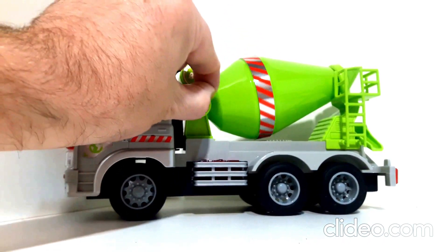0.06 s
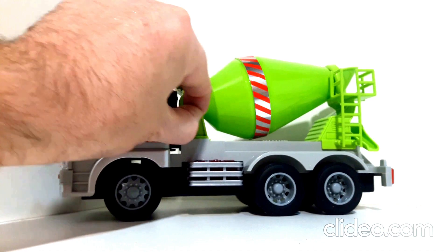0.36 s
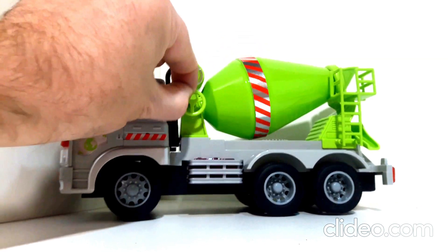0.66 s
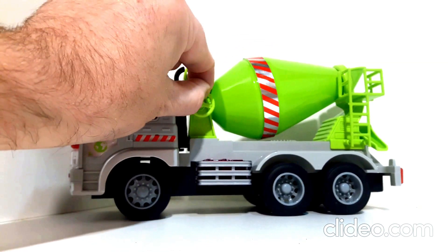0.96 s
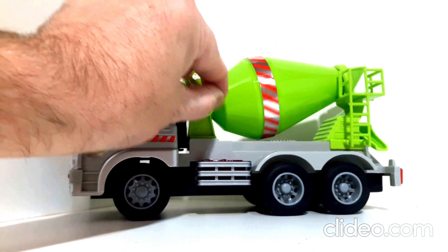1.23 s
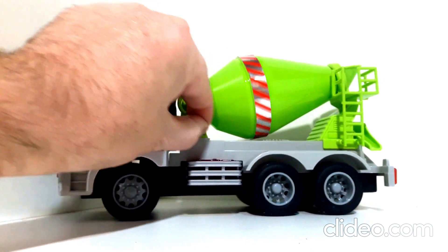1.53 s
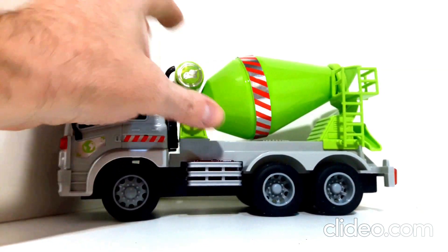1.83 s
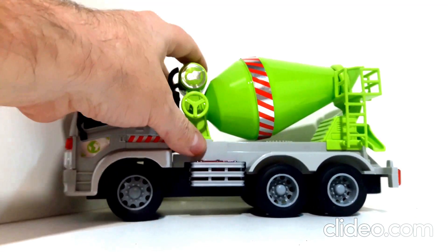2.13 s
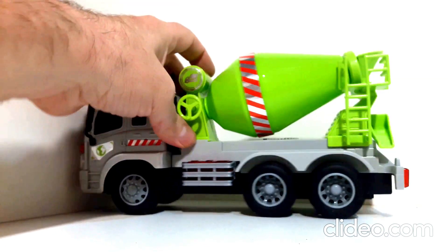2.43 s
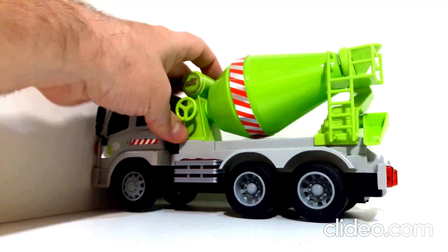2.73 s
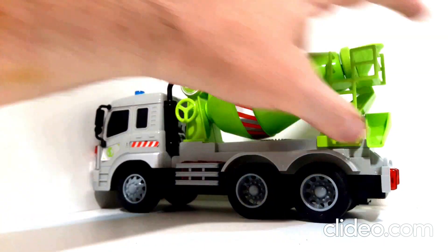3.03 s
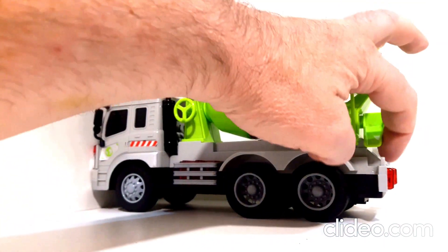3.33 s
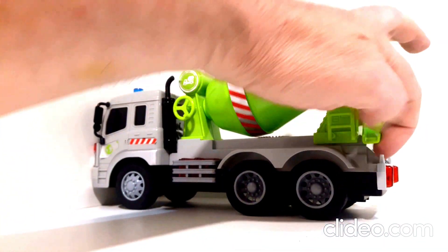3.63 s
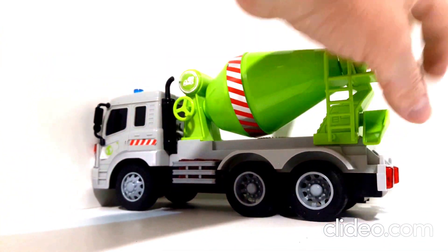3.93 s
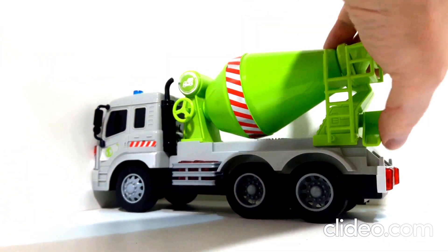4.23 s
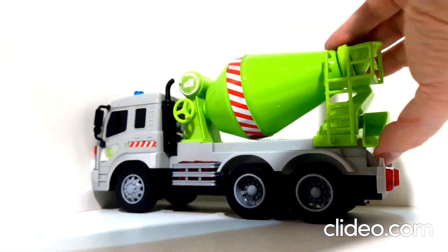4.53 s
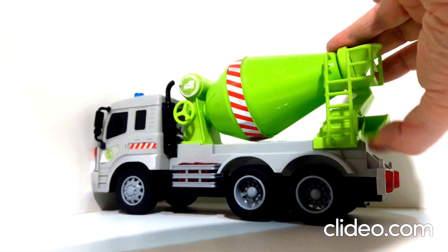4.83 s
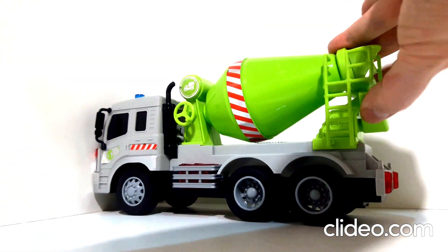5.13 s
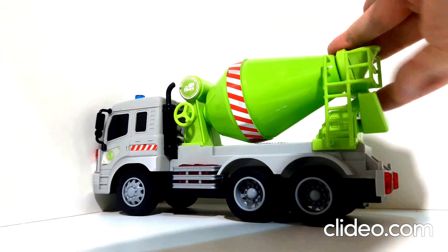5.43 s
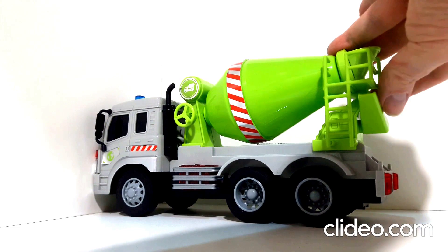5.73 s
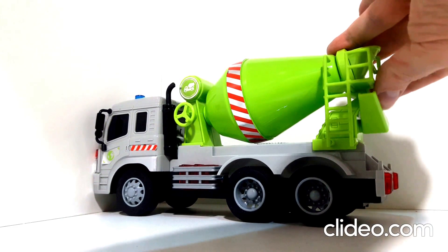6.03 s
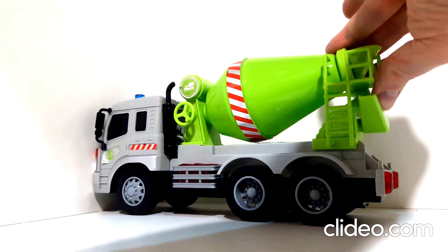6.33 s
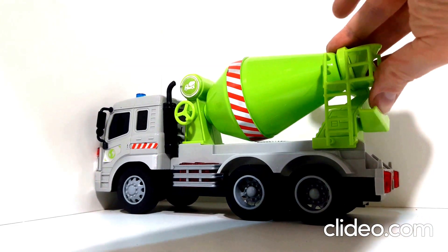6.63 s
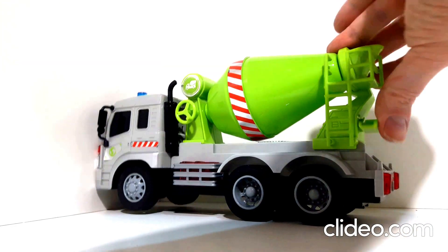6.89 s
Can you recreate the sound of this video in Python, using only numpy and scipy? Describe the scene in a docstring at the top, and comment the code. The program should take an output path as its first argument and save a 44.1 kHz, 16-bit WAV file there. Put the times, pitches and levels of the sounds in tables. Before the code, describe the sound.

A plastic toy truck's ratchet snaps quickly, then the toy knocks and squeaks as it is shoved, ending with light taps and a clack.

```python
"""Toy mixer truck on a table

Close up, fingers crank the plastic drum: a ratchet snaps and the hollow body knocks.
The truck is shoved round, wheels juddering and squeaking in stick-slip, then set down.
Fingers tap at the rear chute, which drops with a clack. A machine hums faintly in the small room."""
import sys
import numpy as np
from scipy import signal
from scipy.fft import rfft, irfft, next_fast_len
from scipy.io import wavfile
from scipy.ndimage import uniform_filter1d, map_coordinates

SR = 44100
rng = np.random.default_rng(int(sys.argv[2]) if len(sys.argv) > 2 else 0)


def wrap_up_sound(samples):
    """Save the sound to the file named by the first command line argument, as 16-bit audio."""
    columns = np.atleast_2d(samples).T
    # keep every value between -1 and 1, then stretch to whole-number steps
    tamed = np.clip(columns, -1, 1)
    steps = np.round(tamed * 32767).astype(np.int16)
    wavfile.write(sys.argv[1], SR, steps)


N = 306936

# ratchet snaps, one per tooth (time [s], level [dB])
SNAPS = [(0.053, -8.5), (0.1818, -6.5), (0.2397, -8.5), (0.2683, -8), (0.3169, -9), (0.4408, -7.5),
         (0.5509, -7.5), (0.652, -7), (0.7276, -9), (0.904, -8.5), (1.1986, -7), (1.2994, -8.5),
         (1.353, -8.5), (1.3914, -7), (1.4388, -7), (1.6308, -7)]
# snap spectrum (frequency [Hz], gain [dB])
SNAP_SPECTRUM = [(120, -9), (330, -7.5), (600, 8.5), (1000, 3), (1250, -0.5), (1550, 5.5), (2400, 0),
                 (3200, 1), (5300, -0.5), (6600, 1.5), (7600, -4), (9200, -8.5), (11500, -2.5), (15500, -4)]
# ratchet resonances (frequency [Hz], width [Hz], gain [dB])
PAWL_MODES = [(770, 110, 6.5), (1086, 44, 10), (1518, 45, 9), (2519, 50, 5.5), (3190, 160, 4),
              (4360, 210, 3.5), (6300, 200, 3), (6900, 280, 2.5), (7550, 80, 3)]
# snap balance (frequency [Hz], left minus right [dB])
SNAP_BALANCE = [(300, 3), (1000, -5.5), (2200, -2), (4300, 1), (5400, -3.5), (6500, -11.5), (7700, 2),
                (10000, 3.5), (12000, 1.5), (15000, -2.5)]
# stereo likeness of snaps and hiss (frequency [Hz], correlation [-1..1])
SNAP_LIKENESS = [(300, 0.45), (1000, 0.46), (2500, 0.25), (5000, -0.12), (9000, 0.88), (15000, .5)]
# loose parts hitting the body (time [s], level [dB], thump [dB re level], hardness [dB re level],
# note of the struck spot [Hz])
BODY_KNOCKS = [(0.027, -26.5, -11, -9, 650), (0.277, -18, -8, -3, 627), (0.292, -19.5, -9.5, -11, 580),
               (0.327, -21, -13, -8, 650), (0.366, -20.5, -4, -5.5, 370), (0.377, -15, -10, -12, 1004),
               (0.516, -31, -6.5, -4, 980), (0.678, -28.5, -18, -13, 835), (0.863, -6.5, -15, -14, 637),
               (0.934, -26, -13, -6.5, 970), (1.037, -30, -20, -4.5, 1040), (1.089, -30.5, -15, -1, 940),
               (1.456, -22.5, -29, -5, 827), (1.51, -17, -22, 1, 776), (1.54, -17.5, -9.5, -10.5, 807),
               (1.558, -13, -7.5, -4, 976), (1.718, -27, -21, -9.5, 1050), (1.742, -26, -16, -9, 997),
               (2.107, -24, -9, -3, 760), (2.167, -21.5, -20, -14.5, 964), (2.207, -28, -19, -8, 846),
               (2.234, -31, -17, -2.5, 830), (2.26, -18, -12.5, -13.5, 550), (2.33, -17.5, -5.5, -12, 600),
               (2.344, -17, -5, -14, 454), (2.454, -18, -21, -4, 540), (2.543, -28, -21, -3.5, 616),
               (2.597, -13, -22, -10, 547), (2.658, -11, -15.5, -9, 550), (2.734, -16.5, -13, -5, 633),
               (2.753, -22, -13.5, -3, 630), (2.875, -13.5, -10, -14.5, 860),
               (2.888, -14.5, -10.5, -1, 913), (2.91, -18.5, -12.5, -4.5, 587),
               (2.943, -20, -9.5, 0.5, 792), (2.973, -25.5, -12, -5, 1075), (3.039, -34, -11, -5, 616),
               (3.454, -25.5, -11.5, -13.5, 566), (3.48, -34, -7.5, -3, 1070), (3.771, -39, -20, -7.5, 651),
               (3.834, -29, -16, -4.5, 657), (4.297, -31.5, -9.5, -8.5, 616), (4.413, -33.5, -20, -16, 557),
               (4.521, -26.5, -8, -8.5, 630), (4.604, -31, -9, -10, 608), (5.06, -28, -9, -4, 560),
               (5.559, -38, -5, -10.5, 713), (5.714, -26.5, -10.5, -6, 587), (5.901, -31.5, -10, -6.5, 810),
               (6.61, -35.5, -13, -14, 652), (6.789, -20.5, -7.5, -0.5, 1496),
               (6.793, -11, -13, -6.5, 1092), (6.821, -19, -5, -6, 775), (6.887, -36.5, -2, -3, 600)]
# hollow body resonances (frequency [Hz], width [Hz], gain [dB])
SHELL_MODES = [(104, 43, -3.5), (177, 57, 4), (413, 20, -5.5), (526, 97, -1), (627, 43, 3),
               (799.5, 21, 2.5), (958.6, 25, -2), (1014, 15, -4), (1468, 80, -2.5), (1852, 70, -3.5),
               (2220, 140, -13), (3012, 420, -16.5), (3980, 220, -14.5)]
# broad response of thin plastic (frequency [Hz], gain [dB])
PLASTIC_SPECTRUM = [(40, -31.5), (90, -7.5), (250, -17), (700, -8), (2000, -7.5), (3200, -21),
                    (6800, -21.5), (8500, -38.5), (15000, -38)]
# body balance (frequency [Hz], left minus right [dB])
BODY_BALANCE = [(60, 4.5), (110, -5), (200, -1.5), (380, 1.5), (700, -1.5), (1290, -3), (2380, -1.5),
                (4400, -2), (8120, -5), (15000, 1.5)]
# stereo likeness of body and room noise (frequency [Hz], correlation [-1..1])
BODY_LIKENESS = [(150, 0.91), (350, 0.82), (800, 0.74), (1600, 0.075), (4000, .1)]
# rear chute modes (frequency [Hz], level [dB], t60 [s])
CHUTE_MODES = [(590, -16, 0.05), (930, -2.5, 0.12), (1160, -21, 0.074), (1530, -1, 0.088),
               (1790, -20, 0.055)]
# wheel skids (start [s], length [s], level [dB])
WHEEL_SKIDS = [(2.17, .02, -34), (2.237, .045, -36), (2.331, 0.069, -30.5), (2.453, .046, -23.5),
               (2.582, 0.056, -16), (2.643, .048, -22.5), (2.689, 0.051, -34.5), (2.739, 0.034, -29)]
# wheel and chassis resonances (frequency [Hz], width [Hz], gain [dB])
CHASSIS_MODES = [(179, 26, -2), (577, 84, 1), (1014, 24, 0.5), (1503, 96, -8.5), (1900, 110, -7),
                 (2430, 16, -18.5), (2850, 63, -26.5), (3340, 44, -22), (3830, 120, -24.5)]
# wheel squeaks (start [s], length [s], level [dB], start pitch [Hz], end pitch [Hz])
WHEEL_SQUEAKS = [(2.178, 0.015, -20, 554, 490), (2.264, 0.015, -22, 608, 556),
                 (2.387, 0.032, -10, 979, 972), (2.407, 0.014, -35, 955, 980),
                 (2.449, 0.013, -29, 2250, 1930), (2.54, 0.019, -26, 2160, 2010),
                 (2.592, 0.015, -7.5, 556.6, 531), (2.666, 0.028, -24, 562, 550),
                 (2.731, 0.018, -25.5, 3090, 2960)]
# squeak partials (harmonic [n], level [dB])
SQUEAK_HARMONICS = [(1, 0), (2, -20.5), (3, -34.5), (4, -37)]
# fingernails and hard edges catching (time [s], level [dB])
EDGE_TICKS = [(1.0139, -33), (1.0898, -37), (1.1169, -33.5), (1.933, -40.5), (2.079, -39), (2.6, -19),
              (2.879, -26.5), (3.3357, -48.5), (3.4303, -48.5), (3.4957, -33), (4.717, -45),
              (4.8435, -41.5), (5.7152, -30.5)]
# fingers working the crank (time [s], effort [dB])
CRANKING = [(0.0, -44), (0.386, -45), (0.57, -36.5), (0.902, -44.5), (1.218, -43.5), (1.454, -35),
            (1.564, -36.5), (1.698, -51), (1.8, -50)]
# hand shoving the truck (time [s], effort [dB])
SHOVING = [(2.05, -46.5), (2.156, -43.5), (2.288, -38.5), (2.528, -35.5), (2.76, -32)]
# axle and finger drag spectrum (frequency [Hz], gain [dB])
RUB_SPECTRUM = [(59, -32.5), (100, 4.5), (334, 1), (976, 4.5), (1270, -3.5), (1500, -1.5), (2070, -14),
                (2850, -13), (3930, -26), (6790, -23), (9000, -43.5), (11700, -60.5), (19800, -120)]
# skin sliding on plastic (start [s], length [s], level [dB])
FINGER_SLIDES = [(0, 0.045, -41.5), (1.994, 0.18, -50.5), (2.15, 0.665, -55.5), (3.721, 0.24, -56.5),
                 (3.938, 0.13, -56), (4.447, .16, -62.5), (5.33, 0.13, -61.5), (5.636, 0.063, -58)]
# spectrum of finger slides and chute crack (frequency [Hz], gain [dB])
CONTACT_SPECTRUM = [(500, -5.5), (2000, 8), (4500, 1), (7000, -4.5), (9000, -8.5), (15000, -5.5)]
# room decay (frequency [Hz], t60 [s])
ROOM_DECAY = [(150, 0.31), (1000, 0.33), (6000, 0.34), (15000, 0.28)]
# room noise envelope (time [s], level [dB])
ROOM_LEVEL = [(0, -52), (1.9, -47), (2.8, -52), (3.6, -53), (4.3, -47), (6.9, -47.5)]
# room noise spectrum (frequency [Hz], gain [dB])
ROOM_SPECTRUM = [(15, -74.5), (25, -40.5), (43, -26), (70, -1), (92, -4), (110, -10.5), (151, -8),
                 (241, -2), (293, -19), (425, -8.5), (911, -14), (1220, -13), (2270, -26.5), (9000, -52.5),
                 (11700, -85.5), (19800, -120)]
# machine hum (frequency [Hz], level [dB re room envelope])
HUM_PARTIALS = [(80.7, -7), (161.5, -8.5), (215.4, -17), (242.2, -8.5), (323, -17.5), (430.7, -19)]
# spectrum of hiss and pawl scrape (frequency [Hz], gain [dB])
HISS_SPECTRUM = [(1500, -16), (4000, 0.5), (6800, -4), (9000, -11.5), (12000, 0.5), (15500, -3)]


def ratchet(creep_s=.003, uneven_db=2.5, bands_db=(-15, -11.5, -14)):
    """The pawl creeps off a tooth and drops; plastic modes ring, coloured anew for each tooth."""
    out, t = np.zeros((2, N)), np.arange(SR // 4) / SR
    pawl = noise(len(t))  # common to all teeth
    drop = decay(np.maximum(t - creep_s, 0), attack_s=.001, t60_s=.063, tail_db=-33, tail_t60_s=.3)
    force = drop + amp(-8) * (t < 2 * creep_s) * t / (2 * creep_s)
    for s, db in SNAPS:
        tooth = np.transpose([np.geomspace(400, 16000, 48), uneven_db * rng.standard_normal(48)])

        def colour(hz):
            broad = amp(along(SNAP_SPECTRUM, hz) + along(tooth, hz))
            return causal(broad * np.sqrt(1 + mode_power(PAWL_MODES, hz)))

        blow = spread(pawl + 1.1 * noise(len(t)), SNAP_LIKENESS, SNAP_BALANCE, lag_samples=.41)
        ring = filtered(force * blow, colour)
        add(out, s - creep_s + .0005, set_bands(ring, [130, 2500, 8000, 17000], db + np.array(bands_db)))
    return out


def pawl_climbs(base_hz=8300, rise=.13, base_db=-57, strain_db_per_s=51.5, wait_share=.25):
    """The pawl climbs each tooth with a scrape and a fitful rising whistle; slow teeth are louder."""
    out, times = np.zeros((2, N)), np.array([s for s, _ in SNAPS])
    waits = np.clip(np.diff(times, prepend=-.09), .02, .19)
    for s, wait_s in zip(times, waits):
        length_s = wait_share * wait_s
        u = np.linspace(0, 1, int(length_s * SR))
        pitch_hz = base_hz * (1 + rise * u + .066 * rng.standard_normal() + .055 * wobble(1500, len(u)))
        whistle = np.sin(2 * np.pi * np.cumsum(pitch_hz) / SR) * amp(2 * rng.standard_normal())
        scrape = amp(2) * coloured(noise(len(u)), HISS_SPECTRUM)
        level_db = base_db + strain_db_per_s * wait_s + 4 * wobble(200, len(u))
        press = amp(level_db) * np.sqrt(np.abs(np.sin(np.pi * u)))
        add(out, s - length_s, press * (whistle + scrape))
    return out


def knock(db, thump_db, hardness_db, note_hz, damping_db):
    """A loose part chatters on the shell; each spot favours a note. Soft blows thump, hard ones clack."""
    t = np.arange(SR // 3) / SR
    chatter = spread(noise(len(t)), BODY_LIKENESS, BODY_BALANCE, lag_samples=5.2)
    chatter *= decay(t, attack_s=.0011, t60_s=.048, tail_db=-11, tail_t60_s=.15)
    modes = SHELL_MODES + [(note_hz, 45, 6.5)]
    ring = filtered(chatter, lambda hz: plastic_body(modes, hz, broad_db=-2.5, low_hz=70))
    edge_db = -17.5 + .73 * hardness_db - damping_db
    bands_db = np.array([thump_db - .5, -6, hardness_db, edge_db])
    return set_bands(ring, [55, 350, 1200, 3000, 16000], db + bands_db)


def knocks(grip_s=(2.0, 2.8), grip_damping_db=3):
    """Distinct knocks, duller while the palm grips the truck."""
    out = np.zeros((2, N))
    for s, db, thump_db, hardness_db, note_hz in BODY_KNOCKS:
        gripped = grip_s[0] < s < grip_s[1]
        add(out, s, knock(db, thump_db, hardness_db, note_hz, grip_damping_db * gripped))
    return out


def chute(s=6.792, ring_db=-16, crack_db=-23):
    """The chute hits its stop with a bright crack and rings."""
    out, t = np.zeros((2, N)), np.arange(SR // 5) / SR
    ring = sum(amp(db - 60 * t / t60_s) * np.sin(2 * np.pi * (hz * t + rng.random()))
               for hz, db, t60_s in CHUTE_MODES)
    ring *= 1 - np.exp(-t / .00071)
    crack = coloured(noise(len(t)), CONTACT_SPECTRUM)
    crack *= decay(t, attack_s=.0008, t60_s=.05, tail_db=-18, tail_t60_s=.25)
    add(out, s, amp(ring_db) * ring + amp(crack_db) * crack)
    return out


def skids(slip_hz=380, scatter=.28, grit=.074):
    """Wheels stick and slip unevenly, shaking the chassis."""
    out, t = np.zeros((2, N)), np.arange(SR // 6) / SR
    for s, length_s, db in WHEEL_SKIDS:
        press = np.sqrt(np.abs(np.sin(np.pi * np.minimum(t / length_s, 1))))
        slip_s = np.cumsum(rng.lognormal(0, scatter, 100)) / slip_hz
        strengths = rng.lognormal(0, .21, len(slip_s))
        slips = np.bincount((slip_s * SR).astype(int), strengths, len(t))[:len(t)]
        force = [[grit], [.8]] * noise(len(t))  # mid, side
        force[0] += unit(slips - slips.mean())
        drive = spread(force * press, BODY_LIKENESS, BODY_BALANCE, lag_samples=1.7)
        shake = filtered(drive, lambda hz: plastic_body(CHASSIS_MODES, hz, broad_db=-13, low_hz=330))
        add(out, s, amp(db) * unit(shake) * np.sqrt(length_s / t[-1]))
    return out


def squeaks(jitter=.025):
    """The slipping briefly locks into an unsteady, mostly falling tone."""
    out = np.zeros((2, N))
    for s, length_s, db, start_hz, end_hz in WHEEL_SQUEAKS:
        u = np.linspace(0, 1, int(length_s * SR))
        pitch_hz = (start_hz + (end_hz - start_hz) * u) * (1 + jitter * wobble(450, len(u)))
        phase = 2 * np.pi * np.cumsum(pitch_hz) / SR
        tone = sum(amp(level_db) * np.sin(k * phase) for k, level_db in SQUEAK_HARMONICS)
        add(out, s, amp([[db - 4.5], [db + 1.5]]) * tone * np.sin(np.pi * u) ** 2.1)
    return out


def ticks():
    """A nail or hard edge catches: a tiny crack."""
    out, t = np.zeros((2, N)), np.arange(SR // 12) / SR
    for s, db in EDGE_TICKS:
        crack = noise(len(t)) * decay(t, attack_s=.0002, t60_s=.0097, tail_db=-12, tail_t60_s=.073)
        add(out, s, set_bands(crack, [1500, 7500, 16000], [db - 11, db - 20]))
    return out


def rattles(rate_hz=12, above_effort_db=7, scatter_db=3.5):
    """Loose parts rattle at random, as hard as the hand works."""
    out, effort_db = np.zeros((2, N)), np.maximum(effort(CRANKING), effort(SHOVING))
    for k in range(int(SHOVING[-1][0] * rate_hz)):
        s = (k + rng.random()) / rate_hz
        db = effort_db[int(s * SR)] + above_effort_db + scatter_db * rng.standard_normal()
        note_hz = 899 * rng.lognormal(0, .17)
        add(out, s, knock(db, thump_db=-11.5, hardness_db=-2.5, note_hz=note_hz, damping_db=2.5))
    return out


def rubbing(crank_db=-3, shove_db=-1):
    """Axle and fingers drag on plastic in uneven surges, louder with effort."""
    surges = noise(N) * amp(4 * np.tanh(wobble(90)))
    drive = spread(surges, BODY_LIKENESS, BODY_BALANCE, lag_samples=1.7)
    drag = filtered(drive, lambda hz: causal(amp(along(RUB_SPECTRUM, hz))))
    return unit(drag) * (amp(effort(CRANKING) + crank_db) + amp(effort(SHOVING) + shove_db))


def slides():
    """Fingertips shift grip with a grainy whisper."""
    press = sum(amp(db) * np.sqrt(curve([(s, 0), (s + length_s / 2, 1), (s + length_s, 0)]))
                for s, length_s, db in FINGER_SLIDES)
    grain = noise(N) * amp(2.7 * wobble(250))
    return press * coloured(grain, CONTACT_SPECTRUM)


def room_echo(x):
    """Wall reflections: a short noise tail, 5 ms late."""
    hz, t, spectra = signal.stft(noise(SR // 2), SR, nperseg=256)
    tail = signal.istft(spectra * amp(-60 * t / along(ROOM_DECAY, hz)[:, None]), SR, nperseg=256)[1]
    delayed = np.pad(x, ((0, 0), (SR // 200, 0)))
    return signal.fftconvolve(delayed, tail / np.linalg.norm(tail[0]), axes=1)[:, :N]


def machine_hum(waver_db=1.5, waver_rad=.45):
    """Hum partials, each wavering in level and phase."""
    t = np.arange(N) / SR
    hum = sum(amp(db + waver_db * wobble(4)) * np.sin(2 * np.pi * hz * t + waver_rad * wobble(5))
              for hz, db in HUM_PARTIALS)
    return np.sqrt(2) * hum * amp([[-1.5], [.8]])


def background(hiss_max_db=-70, hiss_swing=1.3):
    """Hum, room noise and fine hiss rise and fall together."""
    room_db, hum = curve(ROOM_LEVEL), machine_hum()
    air = coloured(spread(noise(N), BODY_LIKENESS, [(100, -1.5), (2000, -3)]), ROOM_SPECTRUM)
    hiss = coloured(spread(noise(N), SNAP_LIKENESS, [(5000, -.6)]), HISS_SPECTRUM)
    hiss_db = hiss_max_db + hiss_swing * (room_db - room_db.max())
    return amp(room_db) * (amp(-.5) * air + hum) + amp(hiss_db) * hiss


def effort(rows, release_db_per_s=598):
    """Gesture strength [dB] per sample, falling off fast at both ends."""
    t = np.arange(N) / SR
    return curve(rows) - release_db_per_s * np.abs(t - np.clip(t, rows[0][0], rows[-1][0]))


def plastic_body(modes, hz, broad_db, low_hz):
    """Modes on the broad response of thin plastic, which radiates little below low_hz."""
    power = mode_power(modes, hz) / (1 + (hz / 4500) ** 4)
    wall = amp(along(PLASTIC_SPECTRUM, hz) + broad_db)
    return causal(np.sqrt((power + wall ** 2) * hz ** 4 / (hz ** 4 + low_hz ** 4)))


def mode_power(modes, hz):
    """Power response of a set of resonances."""
    return sum(amp(db) ** 2 / (1 + (2 * (hz - mode_hz) / width_hz) ** 2)
               for mode_hz, width_hz, db in modes)


def decay(t, attack_s, t60_s, tail_db, tail_t60_s):
    """Fast rise, quick fall, slower tail."""
    return (1 - np.exp(-t / attack_s)) * (amp(-60 * t / t60_s) + amp(tail_db - 60 * t / tail_t60_s))


def set_bands(x, edges_hz, levels_db):
    """Set each band's rms over its loudest 10 ms."""
    out = 0
    for low_hz, high_hz, db in zip(edges_hz, edges_hz[1:], levels_db):
        sos = signal.butter(3, [low_hz, min(high_hz, SR / 2 - 1)], "band", fs=SR, output="sos")
        band = signal.sosfilt(sos, x)
        power = uniform_filter1d(np.mean(band ** 2, 0), SR // 100)
        out = out + amp(db) * band / np.sqrt(power.max())
    return out


def spread(pair, likeness, balance, lag_samples=0):
    """Two unrelated signals to left and right with given correlation, balance and lag."""
    angle = lambda hz: np.arccos(np.clip(along(likeness, hz), -1, 1)) / 2
    mid, side = filtered(pair, lambda hz: np.array([np.cos(angle(hz)), np.sin(angle(hz))]))
    ears = np.array([[.5], [-.5]])
    pan = lambda hz: amp(ears * along(balance, hz)) * np.exp(2j * np.pi * ears * hz * lag_samples / SR)
    return filtered(np.array([mid + side, mid - side]), pan)


def causal(gain):
    """Minimum-phase response: rings only after the blow."""
    cepstrum = irfft(np.log(np.maximum(gain, 1e-6)))
    half = len(cepstrum) // 2
    cepstrum[1:half] *= 2
    cepstrum[half + 1:] = 0
    return np.exp(rfft(cepstrum))


def filtered(x, response):
    """Apply response(hz) by FFT."""
    n = x.shape[-1]
    padded = next_fast_len(n + 4096)
    return irfft(rfft(x, padded) * response(np.fft.rfftfreq(padded, 1 / SR)), padded)[..., :n]


def coloured(x, spectrum):
    """Shape by a spectrum table, to rms 1."""
    return unit(filtered(x, lambda hz: amp(along(spectrum, hz))))


def amp(db):
    """Decibels to gain."""
    return 10 ** (np.asarray(db) / 20)


def unit(x):
    """Scale to rms 1."""
    return x / np.sqrt(np.mean(x ** 2) + 1e-20)


def along(points, hz):
    """Interpolate (frequency [Hz], value) on a log axis."""
    knots_hz, values = np.transpose(points)
    return np.interp(np.log(hz + 1), np.log(knots_hz + 1), values)


def curve(rows):
    """Interpolate (time [s], value) per sample."""
    return np.interp(np.arange(N) / SR, *np.transpose(rows))


def wobble(rate_hz, size=N):
    """Smooth random curve, knots at rate_hz."""
    knots = rng.standard_normal(int(size * rate_hz / SR) + 4)
    return map_coordinates(knots, [np.arange(size) * rate_hz / SR])


def noise(size):
    """Two unrelated white noises."""
    return rng.standard_normal((2, size))


def add(track, s, x):
    """Mix x in from time s."""
    start = max(round(s * SR), 0)
    track[:, start:start + x.shape[1]] += x[:, :N - start]


def scene(echo_db=-18):
    """Toy, echo, handling noise and room."""
    toy = ratchet() + knocks() + chute() + ticks() + skids() + squeaks()
    echo = room_echo(amp(echo_db) * toy)
    return toy + echo + rubbing() + slides() + background() + pawl_climbs() + rattles()


def record(dry, ceiling=.95, cutoff_hz=15850):
    """Soft clip, then brick-wall low-pass."""
    rounded = dry / (1 + np.abs(dry / ceiling) ** 6) ** (1 / 6)
    return filtered(rounded, lambda hz: hz < cutoff_hz)


dry = scene()
out = record(dry)
wrap_up_sound(out)
```